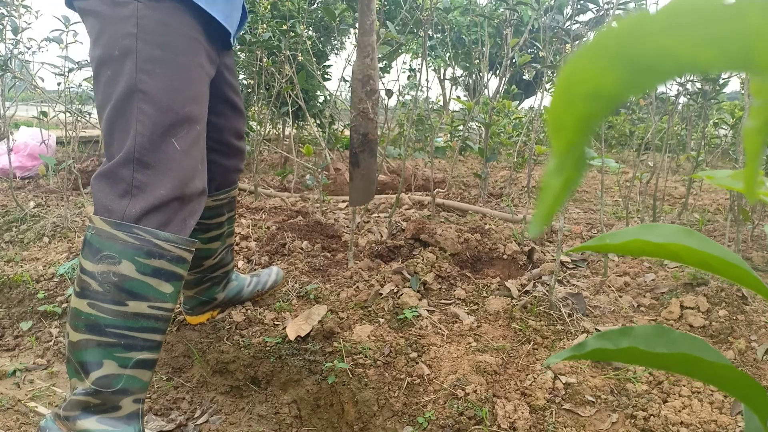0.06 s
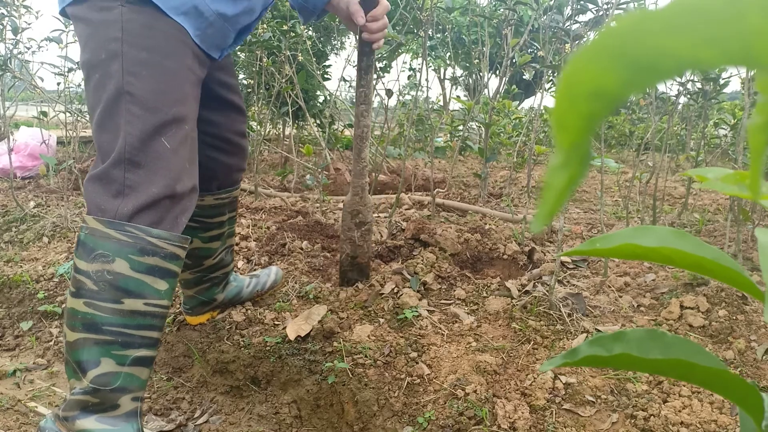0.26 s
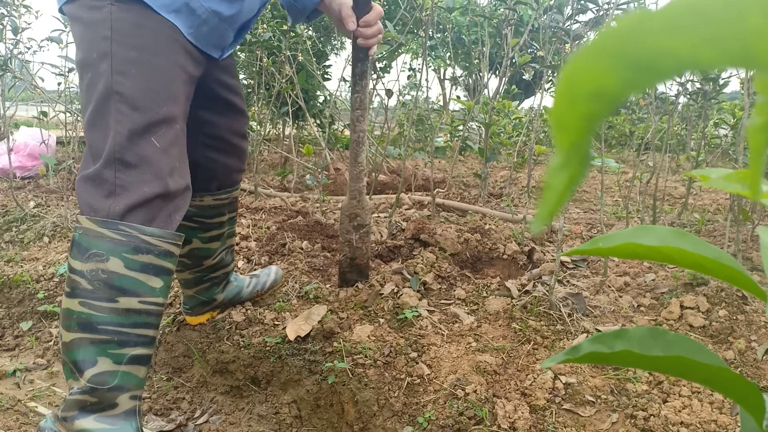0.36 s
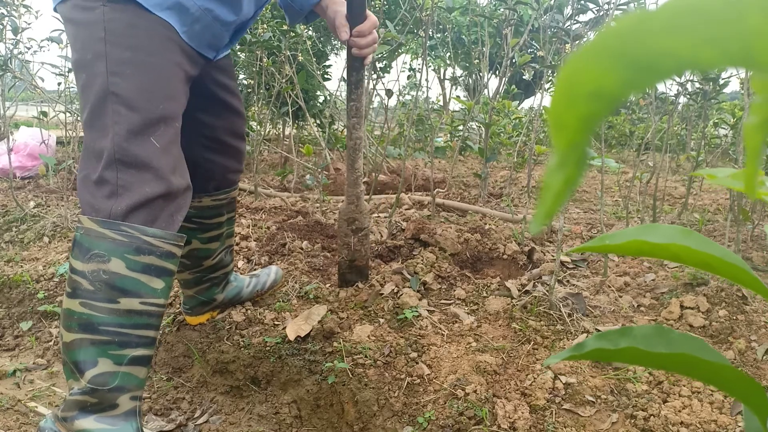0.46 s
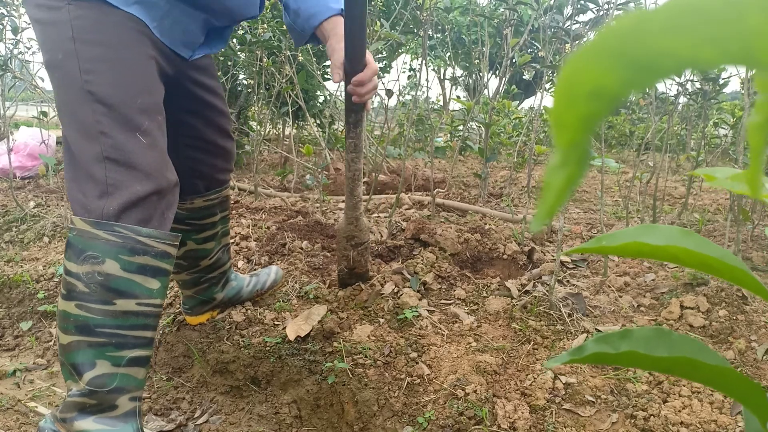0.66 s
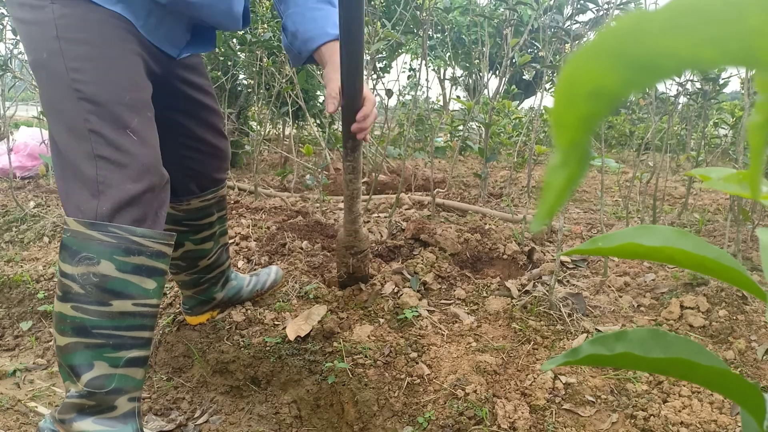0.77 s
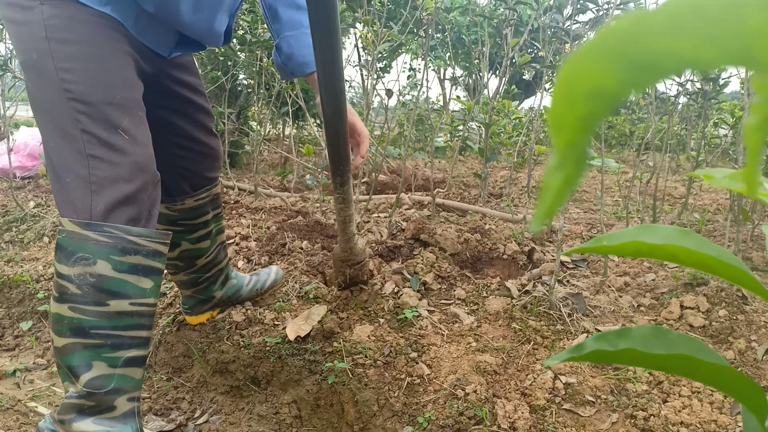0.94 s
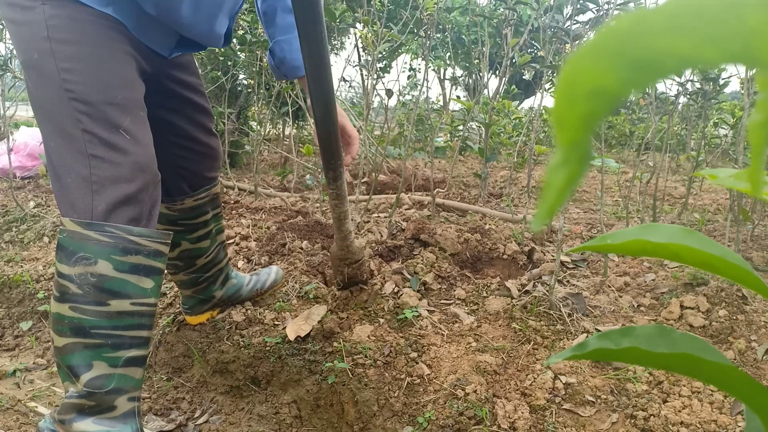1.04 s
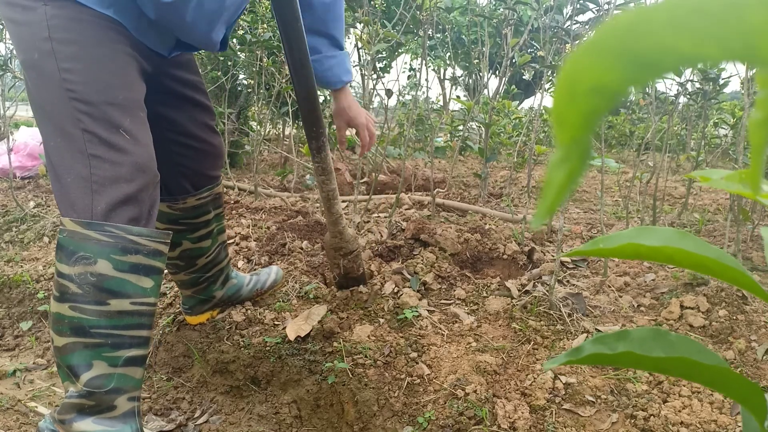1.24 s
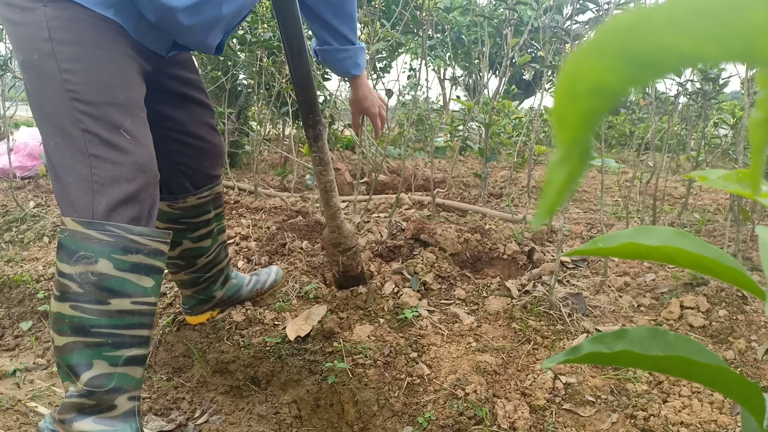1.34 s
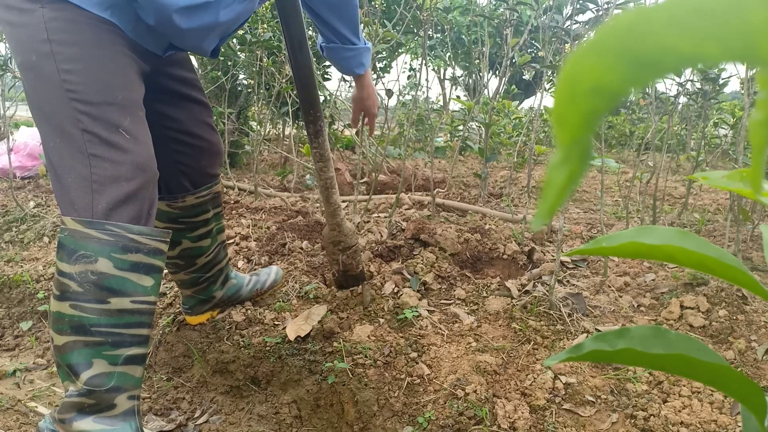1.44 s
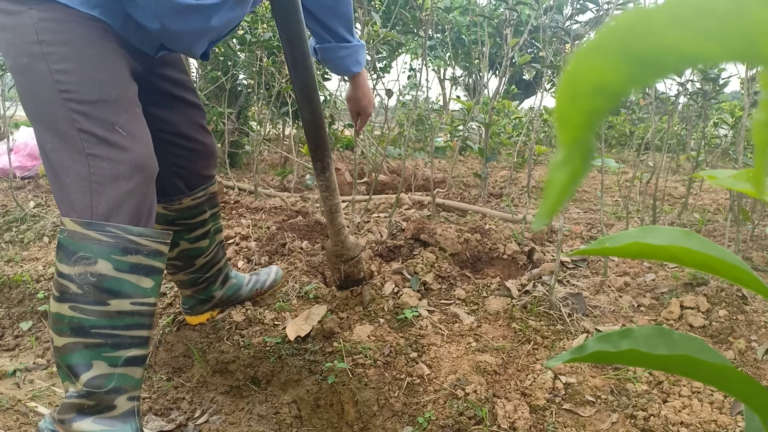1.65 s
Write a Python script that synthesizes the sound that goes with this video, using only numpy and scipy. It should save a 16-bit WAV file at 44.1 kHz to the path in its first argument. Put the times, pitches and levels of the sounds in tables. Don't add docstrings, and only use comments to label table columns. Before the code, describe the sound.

A steel spade is driven once into stony soil with a bright crack and dull thump; grit and pebbles tick afterwards, then soft levering and boot shifts, outdoors with leaf hiss, close stereo microphones.

```python
import sys
import numpy as np
from scipy import signal
from scipy.fft import rfft, irfft, next_fast_len
from scipy.io import wavfile

SR = 44100
rng = np.random.default_rng(int(sys.argv[2]) if len(sys.argv) > 2 else 0)


def how_loud(loudness_db):
    steps = np.asarray(loudness_db, float) / 20
    return 10 ** steps


def digitize_waveform(pressure):
    field = np.atleast_2d(pressure).T
    bounded = np.clip(field, -1, 1)
    quanta = np.round(bounded * 32767).astype(np.int16)
    wavfile.write(sys.argv[1], SR, quanta)


N = 74970

# hz, density_db [dB per Hz]
AIR_SPECTRUM = [(35, -35.5), (60, 1.5), (150, -6.5), (500, -10.5), (1200, -19), (4000, -28.5), (9000, -37),
                (16000, -46)]
# time_s, lift_db
BREEZE = [(0, -2), (.17, 0), (.3, 5), (.55, -0.5), (0.799, 3), (1.051, 0), (1.2, -0.5), (1.35, 1), (1.5, 1),
          (1.7, 4)]
# hz, likeness [0 to 1]
AIR_LIKENESS = [(60, 1), (250, 0.8), (1000, 0.1), (3000, 0.17), (8000, 0.067), (14000, .1)]
# multiple [of the engine pitch], level_db, unsteadiness_db
ENGINE_ORDERS = [(1, -57, 0.5), (2, -63, 3.5), (3, -68.5, 2.5), (4, -92, 6), (5, -83, 2.5),
                 (7.5, -78.5, 8.5)]
# start_s, length_s, from_hz, to_hz, level_db
CHIRPS = [
    (1.42, .052, 5100, 2500, -69.5),
    (1.472, .036, 3300, 4400, -70),
]
# start_s, rise_s, fall_t60_s, level_db
SHUFFLES = [
    (.245, .004, .08, -40),
    (.70, .05, .6, -57),
    (.82, .02, .2, -58),
    (1.07, .015, .1, -60),
    (1.23, .01, .15, -58),
    (1.38, .03, .4, -62),
]
# start_s, pitch_hz, level_db, width_hz
KNOCKS = [(.219, 350, -48, 200), (.2465, 510, -32, 200), (.249, 320, -32, 120), (.254, 80, -40, 55),
          (.2535, 165, -28, 100), (.838, 400, -46, 200), (.8535, 425, -35, 110), (1.085, 600, -50, 200),
          (1.235, 220, -40, 130), (1.24, 470, -48, 150), (1.29, 96, -48, 25), (1.342, 320, -45.5, 55),
          (1.375, 800, -56, 60), (1.388, 820, -51, 50), (1.4, 290, -49, 50), (1.405, 1050, -57, 80),
          (.476, 980, -46, 150), (.852, 270, -46, 120), (.856, 600, -48, 150), (1.254, 350, -47, 150),
          (1.43, 760, -56, 60), (1.455, 300, -51, 60), (1.548, 650, -48, 300), (1.549, 1250, -53, 120)]
# start_s, rise_s, fall_t60_s, level_db
CRUNCHES = [(.095, .015, .1, -56), (.2152, .004, .09, -40), (.224, .002, .07, -46),
            (.2435, .002, .045, -25), (.25, .01, .3, -46), (.32, .03, .3, -55), (.404, .004, .09, -42),
            (.428, .014, .08, -48), (.452, .015, .14, -44), (.479, .003, .1, -39), (.74, .02, .4, -53),
            (.835, .015, .17, -51), (.995, .008, .08, -55), (1.235, .02, .15, -55), (1.54, .008, .12, -47),
            (1.61, .015, .1, -55)]
# peak_s, pitch_hz, body_db, bright_db, left_over_right_db
CONTACTS = [(.1108, 2220, -45, -77, -8), (0.2171, 1390, -25, -51, 1), (.2188, 2000, -36, -48, -6),
            (0.2205, 2500, -39, -44, 10), (0.2207, 2060, -24.5, -32.5, -2), (0.224, 2090, -33, -39, 4),
            (0.225, 2740, -27, -48, 3), (0.229, 2500, -32, -52, -2), (0.237, 2310, -38, -55, -3),
            (.2444, 2500, -27, -40, -1), (.24545, 2800, -11, -8, -1.5), (.24737, 2330, -1, -11, 1),
            (.2501, 2120, -32, -23.5, -7), (0.2524, 2008, -25, -42, -17), (0.4065, 1980, -42.5, -36, 5),
            (0.4059, 2540, -35, -46, 3), (0.4106, 2280, -40, -42, -4), (0.4119, 2500, -44, -48, 7),
            (0.4222, 2200, -48, -56, 0), (0.4446, 2240, -33, -32, 0), (0.4639, 2500, -46, -40, -14),
            (0.4683, 2160, -27, -28, 3), (.4800, 1860, -26.5, -26.5, 3), (0.4702, 2900, -44, -45, 0),
            (0.4762, 2000, -44, -45, -2), (.4828, 2500, -58, -36, 11), (.4852, 2500, -58, -38, 0),
            (0.4874, 2500, -68, -34, -3), (0.49, 2900, -51, -32.5, 8), (.4936, 2420, -44, -34, 6),
            (0.754, 2900, -41, -43.5, -5), (0.859, 2880, -47, -51, -2), (1.0026, 2500, -41, -52, 5),
            (1.2585, 2500, -47, -66, 0), (1.265, 2060, -41, -53, 0), (1.5399, 2930, -43, -62, 5),
            (1.5477, 3100, -38, -38, -8), (1.549, 2200, -46, -51, -11), (1.551, 1400, -50, -42.5, -20),
            (1.5532, 2610, -41, -62, 5), (1.6245, 2800, -44.5, -46.5, -7)]
# hz, level_db, t60_s
BLADE_MODES = [(1166, -34.5, 0.061), (712, -35, 0.057), (1530, -17, 0.011), (2180, -41, .025),
               (2500, -38, 0.05), (2900, -49, .025), (3400, -31, 0.024), (5012, -29, .06), (5440, -61, .3),
               (6310, -36, .05), (7962, -54, 0.061), (587, -39, 0.035), (952, -25, 0.04)]
# start_s, pitch_hz, level_db, t60_s
PINGS = [
    (.2490, 2210, -17, .028),
    (.26, 5766, -54, .35),
    (.472, 5770, -56, .3),
    (1.178, 1960, -56, .12),
    (1.24, 5770, -60, .06),
    (1.262, 5770, -57, .08),
    (1.285, 5770, -61, .1),
    (1.553, 2000, -58, .05),
    (1.563, 3050, -60, .08),
]
# hz, sharpness [Q], gain_db
MIC_PEAKS = [(1300, 2.7, -1), (2274, 1.49, 11), (5545, 3.46, 12), (9800, 3.6, -7.5), (13000, 2, 10)]


def place(s, size):
    out = np.full(N, 1e-18)
    at = np.clip((np.asarray(s) * SR).astype(int), 0, N - 1)
    np.add.at(out, at, size)
    return out


def rms_one(x):
    return x / np.sqrt(np.mean(x ** 2) + 1e-20)


def at_hz(points, hz):
    table_hz, value = np.transpose(points)
    return np.interp(np.log(hz), np.log(table_hz), value)


def drift(rate_hz):
    r = np.exp(-80 * np.pi * rate_hz / SR)
    noise = rng.standard_normal(N // 40 + 2002)
    slow = signal.lfilter([1], [1, -2 * r, r * r], noise)[2000:]
    return np.interp(np.arange(N) / 40, np.arange(len(slow)), rms_one(slow))


def sieve(x, order, hz, kind):
    return signal.sosfilt(signal.butter(order, hz, kind, fs=SR, output="sos"), x)


def ring(clicks, hz, t60_s):
    r = how_loud(-60 / (t60_s * SR))
    w = 2 * np.pi * hz / SR
    return signal.lfilter([0, np.sin(w)], [1, -2 * r * np.cos(w), r * r], clicks)


def swell(clicks, hz, width_hz):
    t60_s = np.log(1000) / (np.pi * width_hz)
    twice = ring(ring(clicks, hz, t60_s), hz, t60_s)
    return twice * 2 * np.e * np.pi * width_hz / SR


def burst(t, hz, half_s):
    return np.exp(-(t / half_s) ** 2 / 2) * np.cos(2 * np.pi * hz * t)


def envelope(rows):
    t = np.arange(N) / SR
    total = 0
    for start_s, rise_s, fall_s, db in rows:
        rise = np.clip((t - start_s) / rise_s, 0, 1) ** 2
        fall_db = 60 * np.maximum(t - start_s - rise_s, 0) / fall_s
        total = total + rise * how_loud(db - fall_db)
    return total


def air():
    level_db, patchy_db = -56, 2.5
    s, db = np.transpose(BREEZE)
    breeze_db = np.interp(np.arange(N) / SR, s, db)
    together = drift(4)
    edges = 30 * 2 ** np.arange(0, 9.3, 1 / 3)
    white = rng.standard_normal((2, 2, N + 8000))
    out = 0
    for k, (low, high) in enumerate(zip(edges, edges[1:])):
        mid, side = sieve(white[k % 2], 2, [low, high], "band")[:, -N:]
        hz = np.sqrt(low * high)
        alike = at_hz(AIR_LIKENESS, hz)
        patches = 0.25 * together + drift(15) * np.clip(2500 / hz, 0.3, 1)
        lift_db = breeze_db * np.clip(hz / 3000, 0.3, 1.5)
        gain = how_loud(at_hz(AIR_SPECTRUM, hz) + lift_db + patchy_db * patches)
        out = out + gain * (np.sqrt(1 + alike) * mid + np.sqrt(1 - alike) * side * [[1], [-1]])
    return how_loud(level_db) * rms_one(out)


def engine():
    pitch_hz, wander, lag_rad = 57.35, 0.001, 2.6
    turns = np.cumsum(pitch_hz * (1 + wander * drift(3.5))) / SR
    hum = 0
    for order, db, wobble_db in ENGINE_ORDERS:
        strength = np.sqrt(2) * how_loud(db + wobble_db * drift(5.1))
        hum = hum + strength * np.cos(2 * np.pi * order * turns - lag_rad / order)
    return hum


def bird():
    bend = 1.9
    t = np.arange(N) / SR
    out = 0
    for start_s, length_s, from_hz, to_hz, db in CHIRPS:
        u = np.clip((t - start_s) / length_s, 0, 1)
        arch = np.sqrt(np.sin(np.pi * u) + 1e-12) * (u < 1) * (u > 0)
        hz = from_hz + (to_hz - from_hz) * u ** bend
        whistle = np.sin(2 * np.pi * np.cumsum(hz) / SR)
        out = out + how_loud(db + 2.1 * drift(60)) * arch * whistle
    return out


def shuffles():
    low_hz, high_hz = 260, 1000
    lumps = rng.standard_normal((2, N)) * envelope(SHUFFLES) * how_loud(11.5 + drift(40))
    mid, side = sieve(lumps, 2, [low_hz, high_hz], "band")
    return mid + 0.24 * side * [[1], [-1]]


def knocks():
    return sum(how_loud(db) * swell(place([s], 1.0), hz, width_hz) for s, hz, db, width_hz in KNOCKS)


def grit():
    grains_per_s, spread_db, low_hz, alike = 2900, 5.5, 780, 0.25
    hits = rng.random((2, N)) < grains_per_s / SR
    sizes = how_loud(spread_db * np.minimum(rng.exponential(1, (2, N)), 3))
    grains = rms_one(hits * sizes * rng.choice([-1, 1], (2, N)))
    mid, side = grains * envelope(CRUNCHES) * how_loud(0.5 * drift(150))
    both = np.sqrt(0.5 + alike / 2) * mid + np.sqrt(0.5 - alike / 2) * side * [[1], [-1]]
    both = sieve(both, 2, low_hz, "high")
    return 0.62 * sieve(both, 1, 3500, "low") + 0.044 * both


def crack(t, hz, body_db, bright_db):
    body_s, bright_s, snap_s = 0.00023, 0.0002715, 0.00006
    edge_hz = np.array([[5810], [4860]])
    tick_db, snap_db = -21, 1
    edge = burst(t - bright_s, edge_hz, bright_s)
    hiss = np.diff(rng.standard_normal((2, len(t) + 1)))
    tick = how_loud(tick_db) * hiss * burst(t, 0, body_s)
    snap = how_loud(snap_db) * burst(t, 4670, snap_s)
    return how_loud(body_db) * burst(t, hz, body_s) + how_loud(bright_db) * (edge + tick + snap)


def spade():
    cracks = np.zeros((2, N))
    span = np.arange(-150, 150)
    for s, hz, body_db, bright_db, pan_db in CONTACTS:
        at = int(s * SR) + span
        pan = how_loud(np.array([[pan_db / 2], [-pan_db / 2]]))
        cracks[:, at] += pan * crack(at / SR - s, hz, body_db, bright_db)
    s, _, body_db, _, _ = np.transpose(CONTACTS)
    blows = signal.lfilter(np.hanning(9) / 4, 1, place(s, how_loud(body_db)))
    modes = sum(how_loud(db) * ring(blows, hz, t60_s) for hz, db, t60_s in BLADE_MODES)
    pings = sum(how_loud(db) * ring(place([s], 0.76), hz, t60_s) for s, hz, db, t60_s in PINGS)
    return cracks - modes - pings


def scene():
    lag_s = np.array([[1e-5], [0]])
    near = spade() * how_loud(-7.5) + knocks()
    size = next_fast_len(N + 64)
    hz = np.arange(size // 2 + 1) * SR / size
    near = irfft(rfft(near, size) * np.exp(-2j * np.pi * hz * lag_s), size)[:, :N]
    return near + grit() + shuffles() + bird() + engine() + air()


def low_pass(x):
    return signal.sosfilt(signal.butter(12, 17070, fs=SR, output="sos"), x)


def record(dry):
    left_db, low_cut_hz, top_hz, offset = -1.5, 55, 15600, 0.001
    x = dry * how_loud(np.array([[left_db / 2], [-left_db / 2]]))
    for hz, sharp, db in MIC_PEAKS:
        a = how_loud(db / 2)
        w = 2 * np.pi * hz / SR
        k = np.sin(w) / (2 * sharp)
        turn = -2 * np.cos(w)
        x = signal.lfilter([1 + k * a, turn, 1 - k * a], [1 + k / a, turn, 1 - k / a], x)
    x = sieve(x, 4, low_cut_hz, "high")
    x = signal.sosfilt(signal.ellip(10, 0.5, 60, top_hz, fs=SR, output="sos"), x)
    mix = np.clip(x + offset, -0.99, 0.99)
    return low_pass(mix)


dry = scene()
out = record(dry)
digitize_waveform(out)
```